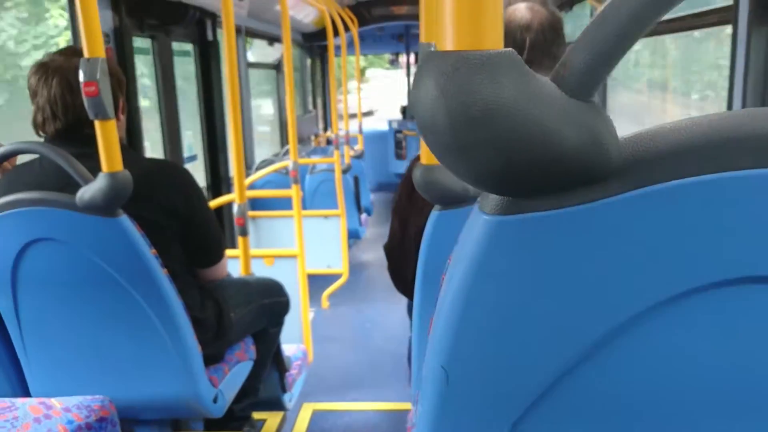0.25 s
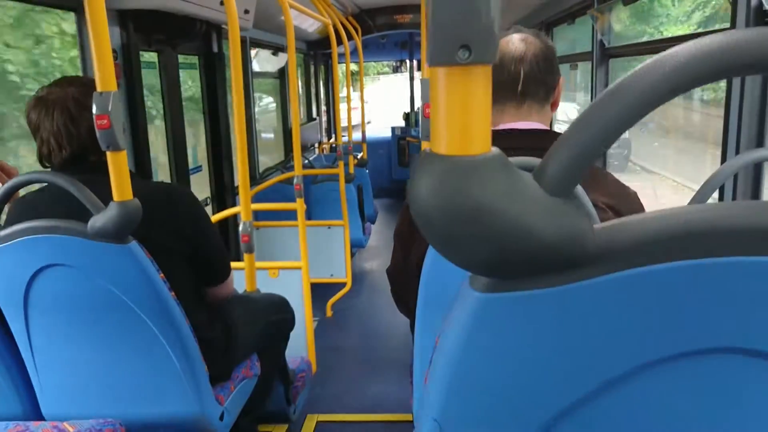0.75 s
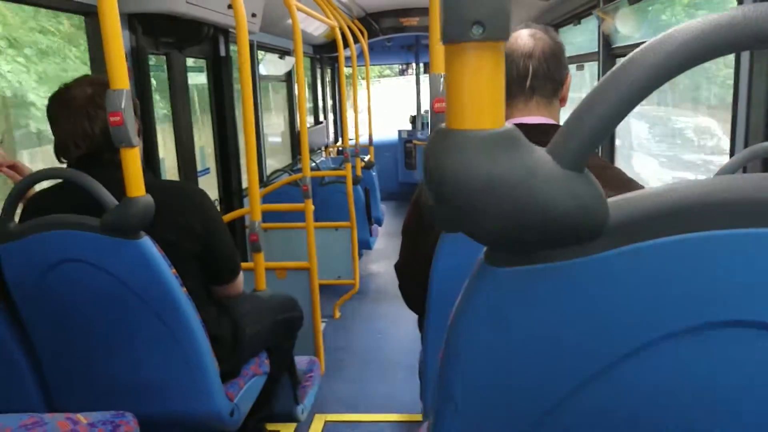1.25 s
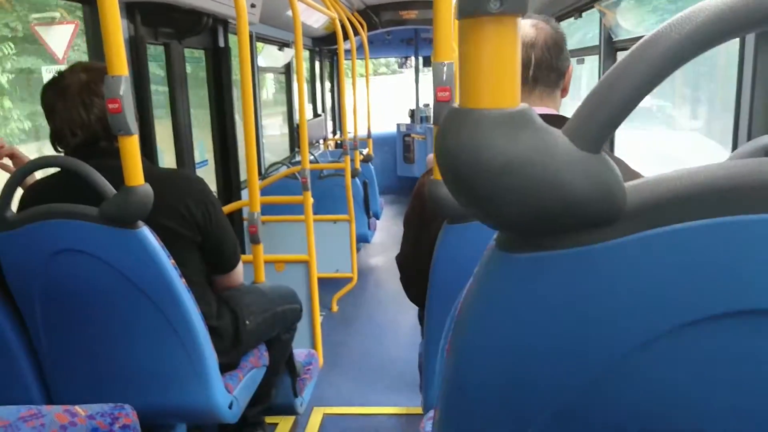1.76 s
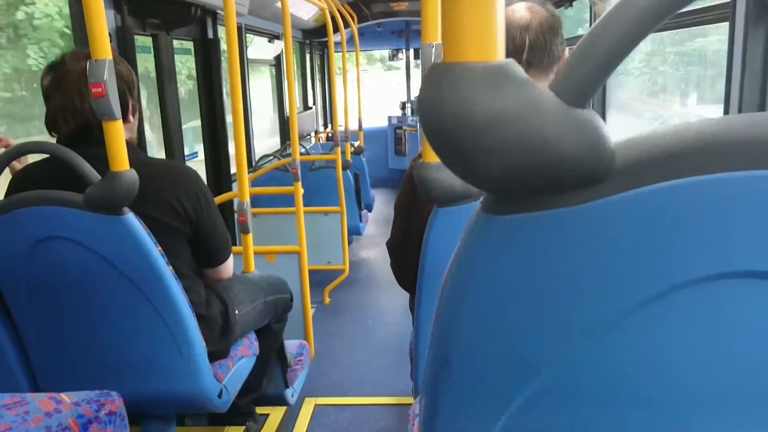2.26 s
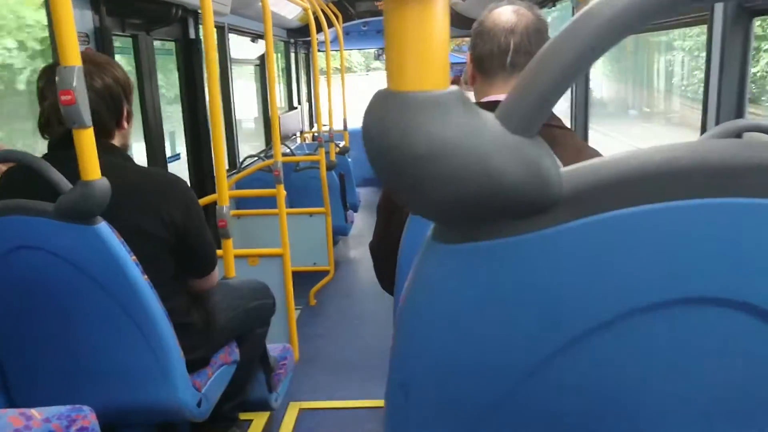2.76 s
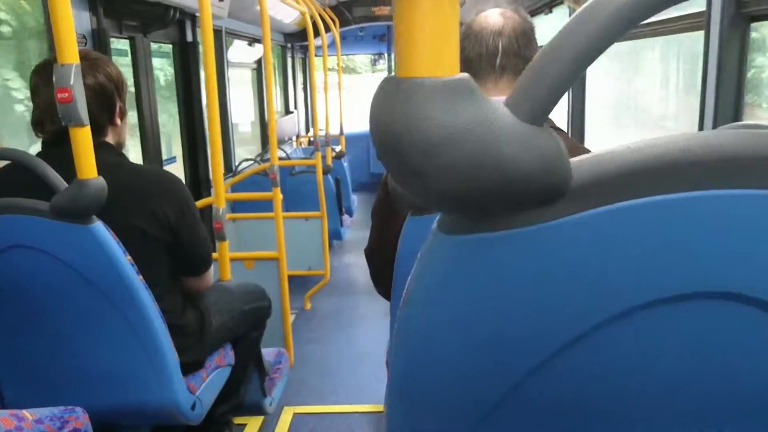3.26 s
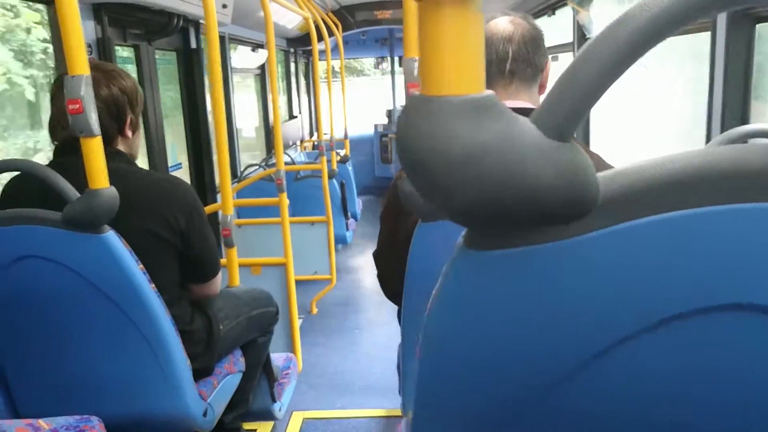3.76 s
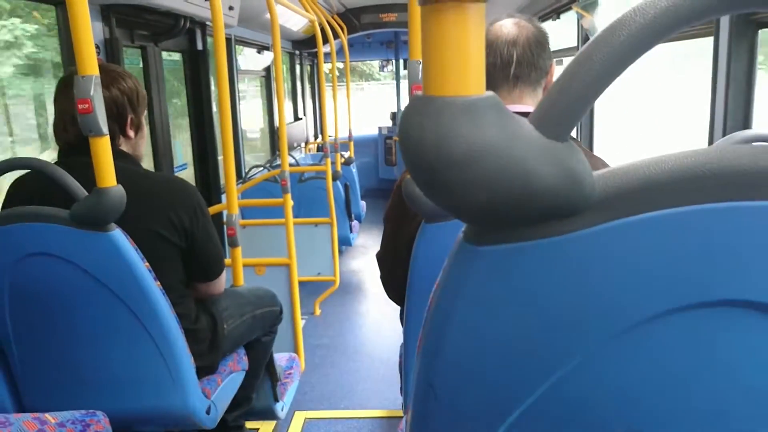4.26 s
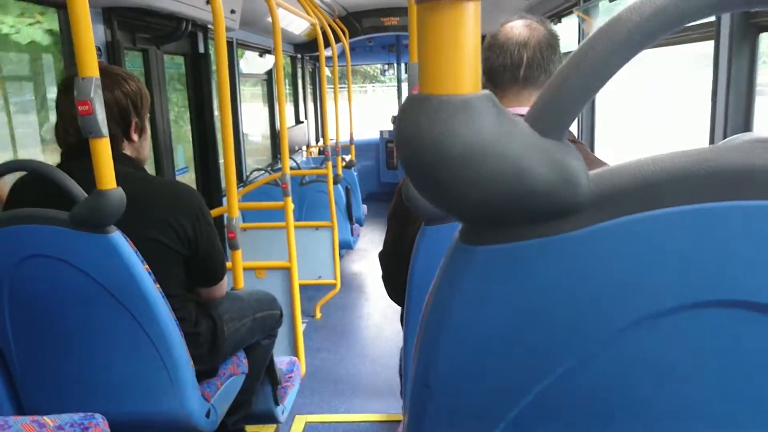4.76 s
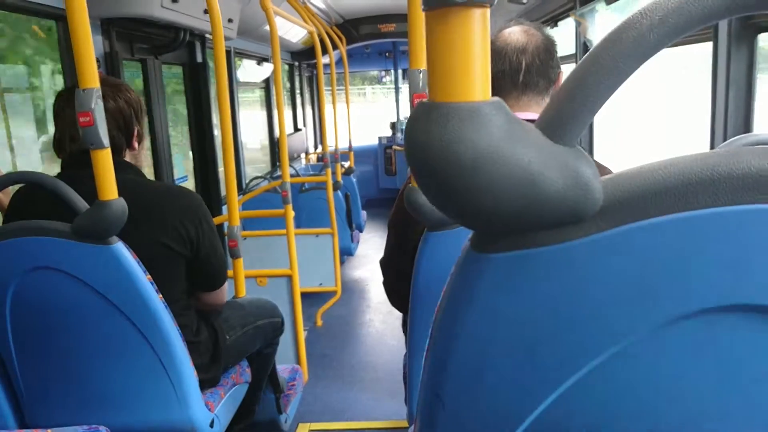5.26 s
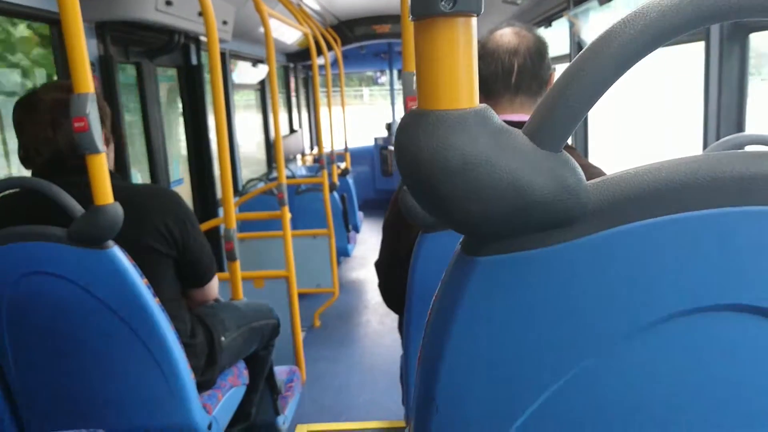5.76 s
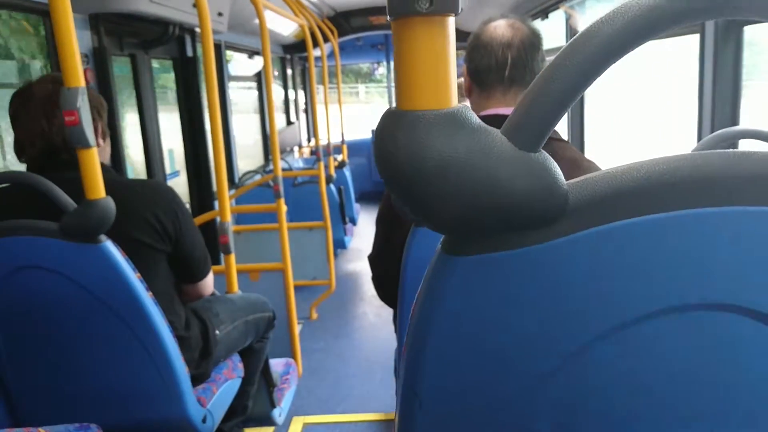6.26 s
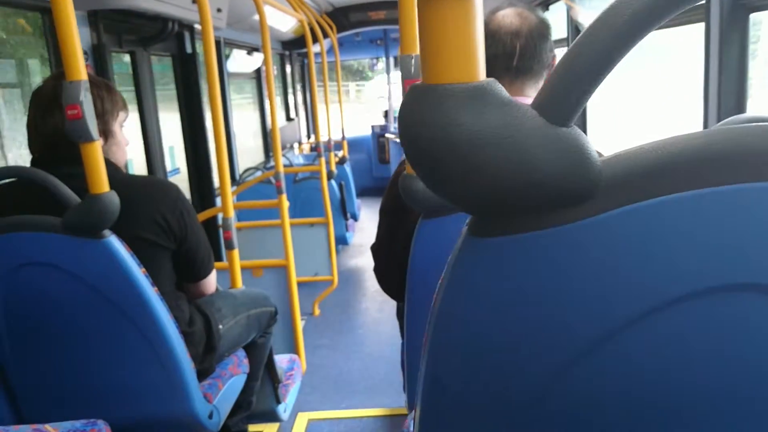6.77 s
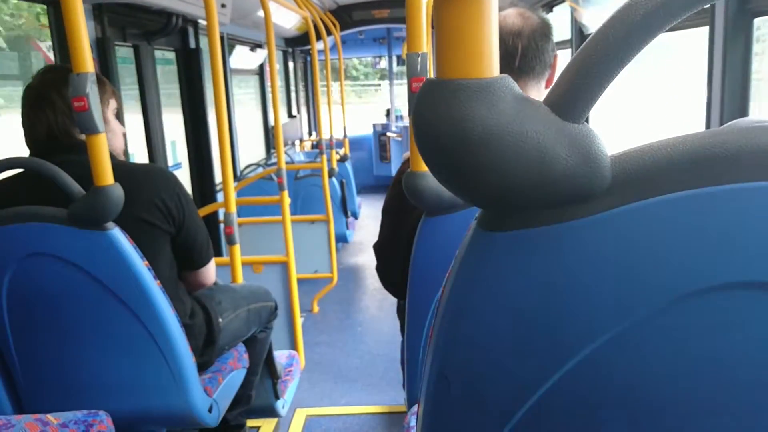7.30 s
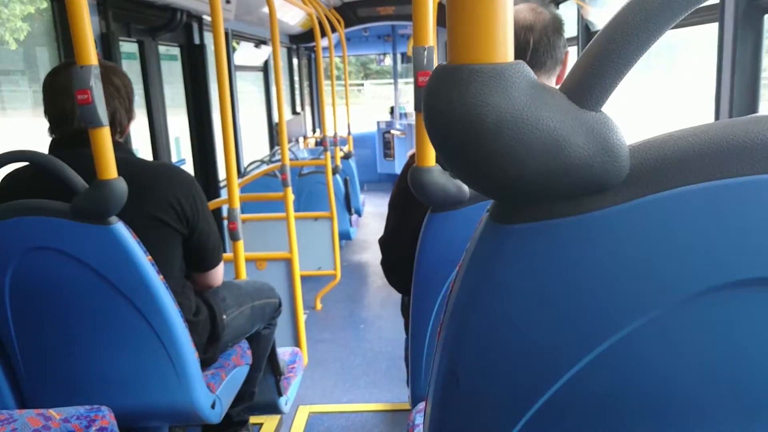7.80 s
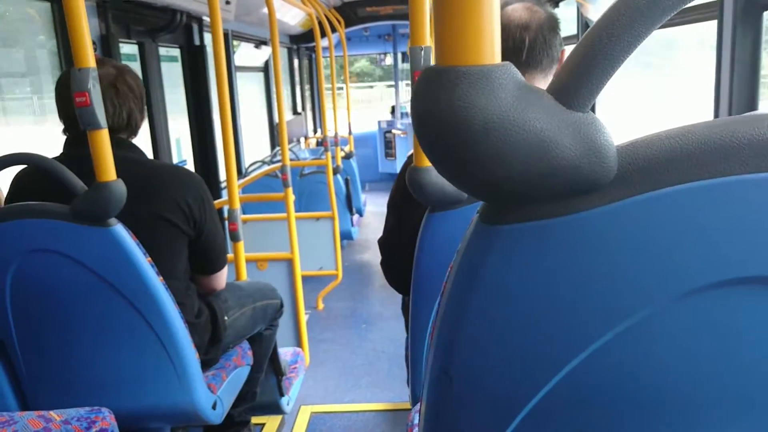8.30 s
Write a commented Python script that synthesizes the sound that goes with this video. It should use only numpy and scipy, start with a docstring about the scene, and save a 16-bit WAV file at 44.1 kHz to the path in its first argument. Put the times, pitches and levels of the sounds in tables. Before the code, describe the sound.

Inside a bus, a diesel engine booms and whines, its pitch sagging and picking up, over rumbling tyres and rattling trim, then drops as the throttle closes.

```python
"""Diesel bus pulling hard, heard from the back seat

A four-cylinder rear engine booms and growls as firing orders sweep through the saloon's resonances; the throttle
closes around 7 s. A geared fan drones, timing gears whine and noise pulsed by the firings makes the clatter.
Filtered noise makes the tyre rumble and thuds; a rough stretch and bumps shake the trim, which rattles as
dense little collisions and ringing knocks. Fittings squeak as short tones of unsteady pitch."""
import sys
import numpy as np
from scipy import signal
from scipy.fft import rfft, irfft, next_fast_len
from scipy.io import wavfile
from scipy.ndimage import uniform_filter1d

SR = 44100
rng = np.random.default_rng(int(sys.argv[2]) if len(sys.argv) > 2 else 0)


def to_wav(sig):
    """Store sig (one row per channel, or 1-D mono) as 16-bit WAV at the path in sys.argv[1].

    Samples outside -1..1 are clipped; the rate is SR.
    """
    pcm = np.clip(np.atleast_2d(sig), -1, 1) * 32767
    pcm = np.round(pcm).astype(np.int16)
    wavfile.write(sys.argv[1], SR, pcm.T)  # frames by channels


N = 376613
TIME = np.arange(N) / SR

# engine speed: sags under load, is picked up twice, falls once the throttle is lifted: time_s, speed_rpm
ENGINE_SPEED = [(0, 2695), (.3, 2677), (.6, 2639), (.95, 2613), (1.3, 2570), (1.75, 2515), (2.2, 2435),
                (2.6, 2348), (3, 2238), (3.3, 2132), (3.47, 2042), (3.62, 2179), (3.8, 2403), (4.09, 2645),
                (4.3, 2523), (4.55, 2404), (4.8, 2251), (4.95, 2318), (5.2, 2454), (5.44, 2546),
                (5.6, 2579), (5.9, 2442), (6.5, 2193), (6.78, 2043), (7.04, 1886), (7.25, 1548),
                (7.39, 1390), (7.65, 1465), (8.1, 1385), (8.54, 1342)]
# the throttle closes: when it starts to, and how long it takes
LIFT_AT_S, LIFT_TAKES_S = 6.47, 1
# the three lowest engine orders: strength_db, closed_throttle_change_db, flutter_0_to_1
BOOM_ORDERS = [(-4, -14.5, 0.5), (0.5, -14, 0), (-9, 4.5, 0.12)]
# low standing waves of the saloon: pitch_hz, width_hz, resonance_level_db (relative), right_minus_left_db
BOOM_MODES = [(45.86, 0.57, -13.5, 4.5), (82.12, 5.9, -21, 12.5), (111.5, 5.5, -23, -1),
              (133.7, 5.7, -24, 2)]
# resonances of the body: pitch_hz, width_hz, lift_db
BODY_RESONANCES = [(138.7, 2.9, 13), (210, 31, 8), (293, 15, 6), (446, 25, -1.5), (553, 29, -16.5)]
FAN_ORDER = 6.711  # blade passes per shaft turn
FAN_THROB_DB = -17.5  # line one shaft order above the blade tone, from a throb once per turn
# unsteadiness of the blade tone: flutter_0_to_1, changes_per_s
FAN_FLUTTER = (.08, 22)
# the fan's two overtones: strength_db, flutter_0_to_1
FAN_OVERTONES = [(0.5, 0.05), (-4.5, .08)]
# how hard the fan drives the air: time_s, blade_tone_db, overtones_db
FAN_DRIVE = [(0, -8, -4), (1.5, 3.3, 1), (2.6, 2, -1), (4.4, 0, -1), (5.5, 3.8, .5), (6.6, 4.6, 2),
             (7.2, -1.5, 1), (7.8, 1, -4), (8.54, -9, -3)]
# standing waves swept by the blade tone: pitch_hz, width_hz, resonance_level_db (relative), right_minus_left_db
FAN_MODES = [(165.5, 1.5, -35, 10), (178.8, 1.5, -22, 5), (208, 2.8, -17, .3), (217.7, 6.2, -31, 2),
             (241.9, 5.4, -26.5, 4.5), (245.7, 4.1, -26.5, -3.5), (275.4, 12, -39.5, 5.5),
             (287.54, 4.86, -23.5, 0), (298.76, 6.9, -22, 2)]
# standing waves swept by the overtones: pitch_hz, width_hz, resonance_level_db (relative), right_minus_left_db
OVERTONE_MODES = [(435, 6.2, -31.5, 2.5), (451.7, 9.6, -40, 3), (470.3, 16, -40, 3), (492, 6.8, -39.5, -2),
                  (524, 4.4, -47, 2), (575.6, 13, -41, 2), (603, 17.5, -43.5, 4.5), (665, 30, -44, 6),
                  (725, 11, -47.5, 7), (763, 18, -59, 4), (803, 16, -47.5, 0.5)]
# combustion clatter over time, which also guides the gears: time_s, level_db
CLATTER_LEVEL = [(0, -38.5), (1, -39), (2, -36.5), (3.5, -40.5), (4.7, -40.5), (5.4, -39.5), (6.3, -40),
                 (7.3, -42.5), (8.54, -41.5)]
# spectrum of the clatter: pitch_hz, density_db (per Hz, relative)
CLATTER_SPECTRUM = [(200, -8.5), (350, -6), (460, -0.5), (600, -5.5), (760, -7), (1000, -10.5), (1400, -11),
                    (2100, -12), (2800, -23), (3300, -23), (4700, -25), (6800, -29.5), (8000, -35.5),
                    (9000, -46.5), (11000, -46), (11700, -80), (14500, -94.5)]
# timing gears: mesh_order (teeth per shaft turn)
GEAR_ORDERS = [36, 47, 50, 54]
# their whines at full load, away from the cover's resonance: level_db
GEAR_LEVELS = [-54, -64.5, -71.5, -65.5]
# resonance of the timing cover: pitch_hz, width_hz, lift_db
GEAR_COVER = (2082, 130, 18)
# the shaft twists to and fro under the firings, so the whines waver: twist_turns, changes_per_s
SHAFT_TWIST = (.0015, 24)
# narrow hiss, likely the turbocharger, as the engine picks up: centre_s, half_length_s, pitch_hz, width_hz, level_db
TURBO_HISS = (3.95, .48, 2360, 180, -50)
# the road grows smoother: time_s, roughness_db
ROUGHNESS = [(0, 3.5), (3.6, -2.5), (4.4, -1), (5, -5.5), (7.4, -3), (8.54, -6)]
# what the road excites: level_db at 0 dB roughness, slope_db_per_db
TYRES, SUSPENSION, FITTINGS = (-31.5, 0.55), (-32, 0.98), (-45, 1.03)
# bumps in the road: peak_s, decay_s, tyre_rumble_db, suspension_thud_db, trim_rattle_db
BUMPS = [(0.251, 0.15, -29, -39.5, -39), (.55, .12, -37, -31, -52.5), (0.901, 0.2, -38.5, -22.5, -37.5),
         (1.471, .1, -27.5, -27, -44), (1.621, 0.13, -26.5, -26.5, -34.5), (2.04, 0.11, -37.5, -33, -45.5),
         (2.221, .21, -25, -27, -33), (2.919, 0.35, -37, -22, -38), (3.719, 0.27, -46.5, -26.5, -47)]
BUMP_RISE_S = 0.057
# spectrum of the tyre rumble: pitch_hz, density_db (per Hz, relative)
RUMBLE_SPECTRUM = [(50, -27), (100, -10.5), (135, -2.5), (170, -11.5), (210, -4.5), (300, 0.5),
                   (350, -11.5), (440, -8), (650, -15.5), (820, -25), (1100, -28.5), (2500, -61.5),
                   (9000, -120)]
# spectrum of the suspension thuds: pitch_hz, density_db (per Hz, relative)
THUD_SPECTRUM = [(20, -37.5), (34, -10), (50, -2.5), (90, -1.5), (125, -12), (170, -21.5), (400, -49.5),
                 (1500, -88.5), (6000, -140)]
# driveline hum: pitch_hz, level_db (before the change below)
DRIVELINE_HUM = [(137, -53), (274, -48), (408, -50.5), (433, -44.5), (470, -48.5), (608, -53), (630, -52)]
# the hum is faint while the engine pulls: time_s, change_db
OVERRUN = [(0, -10), (7.3, -3), (8.54, 4)]
# floor and side panels drone when shaken: centre_s, pitch_hz, half_length_s, level_db, pitch_unsteadiness_0_to_1
DRONES = [(1.47, 203.3, 0.098, -30.5, .05), (1.68, 392, 0.1, -29.5, .06), (2.22, 199.2, 0.13, -33, 0.04),
          (3.38, 139, 0.17, -36, 0.04), (3.85, 128.1, 0.22, -33.5, 0.05), (5.1, 207, 0.2, -38, 0.05)]
# spectrum of the trim rattle: pitch_hz, density_db (per Hz, relative)
RATTLE_SPECTRUM = [(140, -13.5), (230, -7.5), (450, 7), (700, -6.5), (1100, -0.5), (1600, 1), (2300, -4),
                   (3200, -12.5), (5000, -16), (7000, -25), (8200, -28.5), (11000, -44), (12000, -59.5),
                   (14000, -77)]
# ring of the panels and seat frames: pitch_hz, width_hz, lift_db
PANEL_RINGS = [(207, 17, 9), (400, 8, 18), (936, 56, 9.5), (1870, 36, 5), (2340, 71, 3), (3614, 62, 7),
               (4870, 71, 2.5), (6050, 160, 4.5), (7100, 140, 4.5)]
# loose trim knocks: start_s, level_db, decay_s, struck_part_hz, handrail_ring_db
KNOCKS = [(0.814, -32.5, 0.02, 2420, -67), (1.335, -40.5, 0.013, 1800, -71),
          (1.459, -31.5, 0.058, 1980, -60), (1.554, -30.5, 0.023, 1950, -59),
          (1.593, -37.5, 0.014, 1970, -58), (1.612, -38, 0.015, 2060, -58),
          (1.636, -38.5, 0.023, 1990, -46), (1.716, -29, 0.026, 2134, -54), (1.96, -39.5, .02, 1980, -59),
          (2.09, -31.5, 0.029, 2115, -53), (2.124, -40.5, .012, 1830, -58), (2.161, -38, .012, 2030, -57),
          (2.187, -32, 0.03, 2060, -44), (2.218, -34.5, .015, 1610, -56), (2.275, -35.5, 0.026, 1940, -53),
          (2.304, -34, .018, 2090, -55), (2.339, -39, 0.027, 2050, -55), (2.395, -34.5, 0.017, 1970, -59),
          (2.546, -34.5, 0.036, 2450, -72), (2.98, -42.5, 0.045, 2090, -63), (3.053, -44, 0.03, 2150, -63),
          (3.421, -37.5, 0.021, 1800, -65), (4.375, -43, 0.026, 2230, -54), (8.32, -52.5, 0.012, 6830, -73)]
# modes of the steel handrails: pitch_hz, level_db (relative), decay_s
HANDRAIL_MODES = [(2940, -6.5, 0.032), (3640, -3, 0.12), (4300, -6, 0.034), (4730, -6.5, 0.038),
                  (5300, -1, .04), (5800, -2.5, 0.052), (7040, -8, 0.063)]
# fittings rub and squeak: centre_s, pitch_hz, half_length_s, level_db, pitch_unsteadiness_0_to_1
SQUEAKS = [(0.492, 3700, .025, -51, 0.02), (1.094, 1830, 0.018, -46, 0.015),
           (1.237, 1935, 0.018, -46.5, 0.02), (2.6, 11550, 0.074, -64, 0.03),
           (2.955, 5060, 0.03, -51, .003), (2.938, 13800, .03, -65, 0.08),
           (3.51, 2400, 0.035, -41.5, 0.006), (3.77, 2135, .05, -51, .005), (3.78, 7900, .12, -69, .012),
           (6.346, 13700, 0.0095, -62, 0.06), (6.458, 2095, 0.035, -52, 0.02), (6.74, 6930, .05, -64, .006),
           (7.485, 6920, 0.1, -58, 0.012), (7.582, 1990, 0.023, -51, 0.03), (8.002, 8250, 0.11, -65, 0.012),
           (8.33, 6560, 0.021, -65, 0.02)]
# likeness of the sound field at the two microphones: pitch_hz, correlation
LIKENESS = [(60, 0.91), (320, 0.91), (560, 0.49), (980, 0.14), (1700, -0.15), (3000, -0.019)]
# colour of the microphone ports: pitch_hz, left_db, right_db
PORT_COLOUR = [(62, -4, -2.5), (149, 4.5, 6), (247, -0.5, 1.5), (555, 0, 2), (806, -1, 6.5), (870, 0, 0.5),
               (1110, 3.5, 5), (1545, -0.5, 7.5), (2158, -8.5, 15.5), (2269, -8, 10), (2640, 5.5, 5.5),
               (3600, 0, -0.5), (4570, -0.5, 2.5), (5850, -2.5, -1), (6760, 6, -3), (8200, -5.5, -4.5)]
TOP_HZ = 14600


def boom(turns):
    """Two firings a turn shake the saloon's low standing waves; shaft unbalance adds the odd orders."""
    out = 0
    for order, (db, closed_db, flutter) in enumerate(BOOM_ORDERS, 1):
        strength = undb(db + lifted() * closed_db)
        out = out + strength * driven(order * turns, BOOM_MODES, flutter, rate=13)
    return out


def growl(turns, shaft_hz, db=-47, closed_db=-8, count=28):
    """Unequal cylinders give a comb of orders that sweeps through the body's resonances and eases off load."""
    comb = np.zeros(N)
    for order in range(4, count):
        hz = order * shaft_hz[::64]  # coarse steps suffice for the slow gain
        power = sum(undb(lift_db) ** 2 / (1 + (2 * (hz - f) / width) ** 2) for f, width, lift_db in BODY_RESONANCES)
        gain = np.interp(TIME, TIME[::64], np.sqrt(power))
        comb += gain * np.sin(2 * np.pi * (order * turns + rng.random()))
    level_db = db + closed_db * lifted() + 1.4 * walk(5.0)
    return comb * undb(level_db) * pan(right_db=7.0)


def lifted():
    """How far the throttle has closed, 0-1."""
    return np.clip((TIME - LIFT_AT_S) / LIFT_TAKES_S, 0, 1)


def fan(turns, blade_db=-48.0, throb_db=-30.5, overtone_db=-53.5):
    """Blade-passing tone, throb and overtones swell and fade as they sweep through the standing waves."""
    drive_db, overtone_drive_db = curves(FAN_DRIVE)
    blade = driven(FAN_ORDER * turns, FAN_MODES, *FAN_FLUTTER, direct_db=blade_db)
    throb = driven((FAN_ORDER + 1) * turns, FAN_MODES, *FAN_FLUTTER, direct_db=throb_db)
    overtones = 0
    for multiple, (db, flutter) in enumerate(FAN_OVERTONES, 2):
        partial = driven(multiple * FAN_ORDER * turns, OVERTONE_MODES, flutter, rate=18, direct_db=overtone_db)
        overtones = overtones + undb(db) * partial
    return undb(drive_db) * (blade + undb(FAN_THROB_DB) * throb) + undb(overtone_drive_db) * overtones


def clatter(turns, load_db, sharpness=0.072):
    """Combustion noise pulses gently at each firing, smeared by the engine cover."""
    bursts = np.exp(sharpness * np.cos(4 * np.pi * turns) * undb(2.0 * walk(60)) / 2)
    noise = rng.standard_normal((2, N)) * bursts * undb(0.57 * walk(18))
    return field(noise, CLATTER_SPECTRUM) * undb(load_db)


def gears(turns, shaft_hz, load_db):
    """Tooth-mesh whines waver and flutter, swell at the cover's resonance and fade off load."""
    cover_hz, width, lift_db = GEAR_COVER
    twist, twist_rate = SHAFT_TWIST
    turns = turns + twist * walk(twist_rate)
    whine = 0
    for order, db in zip(GEAR_ORDERS, GEAR_LEVELS):
        ring_db = lift_db / (1 + (2 * (order * shaft_hz - cover_hz) / width) ** 2) ** .5
        pair = np.array([tone(order * turns, flutter=0.47, rate=24) for _ in range(2)])
        whine = whine + undb(db + ring_db) * pair
    return whine * undb(1.3 * (load_db - np.max(load_db)))


def turbo():
    """A narrow band of hiss that swells and dies."""
    s, half_s, centre_hz, width, db = TURBO_HISS
    band = lambda hz: 1 / (1 + (2 * (hz - centre_hz) / width) ** 4)
    hiss = unit(shape(rng.standard_normal((2, N)), band))
    return hiss * undb(db) * np.exp(-((TIME - s) / half_s) ** 2)


def jolts():
    """Strength of rumble, thuds and rattle: road roughness plus bumps that rise fast and die away."""
    roughness_db, = curves(ROUGHNESS)
    power = np.array([undb(db + slope * roughness_db) ** 2 for db, slope in (TYRES, SUSPENSION, FITTINGS)])
    for s, decay_s, *levels_db in BUMPS:
        rise = ((TIME - s) / BUMP_RISE_S) ** 2 / 2
        fall = (TIME - s) / decay_s
        bump = np.exp(-np.where(TIME < s, rise, fall))
        power += np.outer(undb(levels_db), bump) ** 2
    return np.sqrt(power)


def road(rolling, thudding):
    """Tyre rumble and suspension thuds through the floor, with the hum of the driveline."""
    rumble = field(rng.standard_normal((2, N)), RUMBLE_SPECTRUM) * rolling
    thuds = unit(shape(rng.standard_normal(N), lambda hz: undb(at_hz(THUD_SPECTRUM, hz)[0]))) * thudding
    hum = sum(undb(db) * tone(hz * TIME, flutter=0.96, rate=8) for hz, db in DRIVELINE_HUM)
    return rumble + thuds * pan(right_db=0.5) + hum * undb(curves(OVERRUN)[0])


def trim(shaking, rate=700, spread_db=-2.5, ring_s=0.0037):
    """Dense little collisions (rate per s) and a few knocks excite noise that rings the panels."""
    strength = undb(spread_db * np.minimum(rng.standard_exponential(N), 3))
    hits = (rng.random(N) < rate / SR) * strength
    keep = np.exp(-2 / (ring_s * SR))  # energy kept per sample
    push = unit(np.sqrt(signal.lfilter([1], [1, -keep], hits ** 2))) * shaking
    for s, db, decay_s, *_ in KNOCKS:
        push = push + undb(db) * (TIME >= s) * np.exp(-np.minimum(np.abs(TIME - s) / decay_s, 20))
    ring = lambda hz: 1 + sum((undb(db) - 1) / (1 + 2j * (hz - f) / width) for f, width, db in PANEL_RINGS)
    rattle = field(shape(rng.standard_normal((2, N)) * push, ring), RATTLE_SPECTRUM)
    return rattle * np.sqrt(np.mean(push ** 2))


def chatter(shaking, count=900, db=-6.5, centre_hz=2080, scatter=.12, decay_s=.007, spread_db=4.5):
    """Loose fittings tap, each a short ring at its own pitch; the harder the shaking, the louder they are."""
    out = np.zeros((2, N))
    for when, pitch, strength, *phases in rng.random((count, 5)):
        start = int(when * N)
        after = TIME[:min(N - start, SR // 20)]
        hz = centre_hz * (1 + scatter * np.log(pitch / (1 - pitch)).clip(-3, 3) / 2)  # bell-shaped scatter
        size = shaking[start] * undb(db + spread_db * min(-np.log(strength), np.e))
        ring = np.sin(2 * np.pi * (hz * after + np.array(phases)[:, None]))
        out[:, start:start + len(after)] += size * np.exp(-after / decay_s) * ring
    return out


def knock_rings(ring_db=-6, decay_s=0.019):
    """Each knocked part rings at its own pitch and sets off the handrails, phased apart at each microphone."""
    out = np.zeros((2, N))
    for s, db, _, hz, rail_db in KNOCKS:
        near = (TIME >= s) & (TIME < s + .3)
        after = TIME[near] - s
        out[:, near] += undb(db + ring_db) * np.exp(-after / decay_s) * np.sin(2 * np.pi * hz * after)
        for mode_hz, mode_db, mode_s in HANDRAIL_MODES:
            struck_hz = mode_hz * (1 + 0.0027 * rng.standard_normal())
            angle = 2 * np.pi * (struck_hz * after + rng.random((2, 1)))
            out[:, near] += undb(rail_db + mode_db) * np.exp(-after / mode_s) * np.sin(angle)
    return out


def squeaks():
    """Stick-slip of the fittings: uneven in strength, scattered on its way to each microphone."""
    return np.array([swells(SQUEAKS, rate=540) * undb(2 * walk(60)) for _ in range(2)])


def saloon(x, size=2200):
    """Windows and panels throw the treble back within some 50 ms, smearing it and rippling its spectrum."""
    echoes = rng.standard_normal((2, size)) * np.linspace(1, 0, size)
    echoes *= .36 / np.sqrt(np.sum(echoes ** 2, axis=1, keepdims=True))
    treble = signal.sosfilt(signal.butter(2, 2500, "high", fs=SR, output="sos"), x)
    return x + signal.oaconvolve(treble, echoes, axes=1)[:, :N]


def driven(turns, modes, flutter, rate, direct_db=-90):
    """A partial swells near each standing wave, lags behind fast sweeps and sinks to the direct sound between."""
    run_up = turns[0] + (turns[1] - turns[0]) * np.arange(-SR // 2, 0)  # half a second to settle the waves
    drive = np.exp(2j * np.pi * (np.concatenate([run_up, turns]) + rng.random()))
    out = undb(direct_db) * drive[-N:]
    for hz, width, db, right_db in modes:
        damping = np.pi * abs(width) / SR
        wave = signal.lfilter([damping], [1, -np.exp(2j * np.pi * hz / SR - damping)], drive)[-N:]
        out = out + undb(db) * pan(right_db) * wave
    unsteady = 1 + flutter * (walk(rate) + 1j * walk(rate))
    return np.sqrt(2 / (1 + 2 * flutter ** 2)) * np.real(out * unsteady)


def tone(turns, flutter, rate):
    """A partial whose strength and phase flutter at about the given rate per s."""
    angle = 2 * np.pi * (turns + rng.random())
    partial = (1 + flutter * walk(rate)) * np.sin(angle) + flutter * walk(rate) * np.cos(angle)
    return np.sqrt(2 / (1 + 2 * flutter ** 2)) * partial


def swells(table, rate):
    """Short tones of unsteady pitch that swell and die."""
    out = np.zeros(N)
    drift = np.cumsum(walk(rate)) / SR
    for s, hz, half_s, db, waver in table:
        near = np.abs(TIME - s) < 3 * half_s
        swell = undb(db) * np.exp(-((TIME[near] - s) / half_s) ** 2)
        out[near] += swell * np.sqrt(2) * np.sin(2 * np.pi * hz * (TIME[near] + waver * drift[near]))
    return out


def field(pair, spectrum):
    """Two unrelated signals become a coloured diffuse field: alike in the bass, unrelated in the treble."""
    sign = np.array([[1], [-1]])

    def response(hz):
        likeness = np.clip(at_hz(LIKENESS, hz), -.99, .99)
        return undb(at_hz(spectrum, hz)) * np.sqrt(1 + sign * likeness)

    mid, side = shape(pair, response)
    return unit(np.array([mid + side, mid - side]))


def shape(x, response):
    """Filter by a function of frequency."""
    size = next_fast_len(N + 4096, True)
    hz = np.maximum(np.arange(size // 2 + 1) * SR / size, 1)
    return irfft(rfft(x, size) * response(hz), size)[..., :N]


def walk(rate):
    """Smooth chance with a spread near 1, changing at the given rate per s."""
    k = max(int(SR / rate), 2)
    steps = rng.standard_normal(8192)
    return 1.3 * uniform_filter1d(np.interp(TIME * rate, np.arange(len(steps)), steps), k)


def curves(table):
    """The columns of a timed table, sample by sample."""
    s, *columns = np.transpose(table)
    return [np.interp(TIME, s, c) for c in columns]


def at_hz(table, hz):
    """The columns of a spectrum, read on a log-frequency axis."""
    f, *columns = np.transpose(table)
    return np.array([np.interp(np.log(hz), np.log(f), c) for c in columns])


def pan(right_db):
    """Gains of the two channels, from the level of right over left."""
    return undb(np.array([[-right_db], [right_db]]) / 2)


def undb(db):
    """Decibels to gain."""
    return 10 ** (np.asarray(db) / 20)


def unit(x):
    """Scale to rms 1."""
    return x / np.sqrt(np.mean(x ** 2))


def scene():
    """One crankshaft drives boom, growl, fan, clatter and gears; the port colour covers all but the first three."""
    shaft_hz = uniform_filter1d(curves(ENGINE_SPEED)[0], size=3000) / 60
    turns = np.cumsum(shaft_hz) / SR
    load_db, = curves(CLATTER_LEVEL)
    engine = boom(turns) + growl(turns, shaft_hz) + fan(turns)
    rolling, thudding, shaking = jolts()
    echoing = saloon(clatter(turns, load_db) + trim(shaking) + chatter(shaking) + knock_rings())
    body = road(rolling, thudding) + swells(DRONES, rate=80) + squeaks() + turbo()
    coloured = echoing + gears(turns, shaft_hz, load_db) + body
    return engine + shape(coloured, lambda hz: undb(at_hz(PORT_COLOUR, hz)))


def record(dry):
    """A steep low-pass cuts the top."""
    return signal.sosfilt(signal.ellip(8, .2, 70, TOP_HZ, fs=SR, output="sos"), dry)


dry = scene()
out = record(dry)
to_wav(out)
```